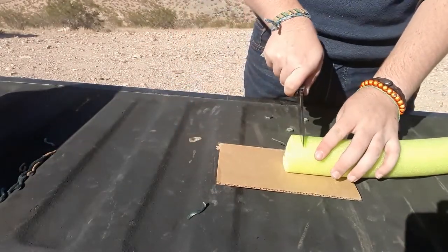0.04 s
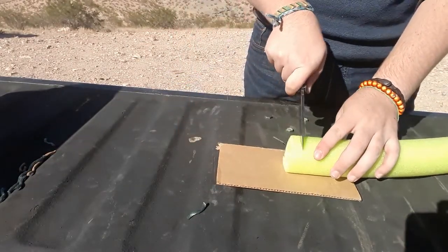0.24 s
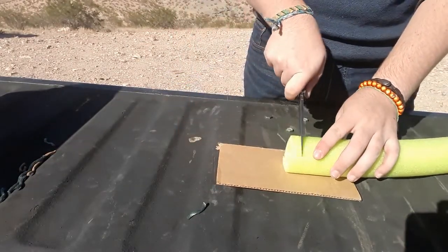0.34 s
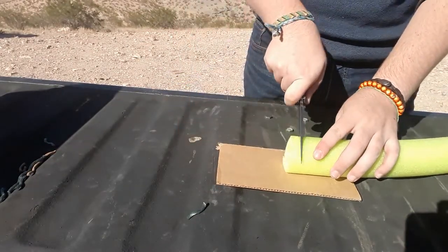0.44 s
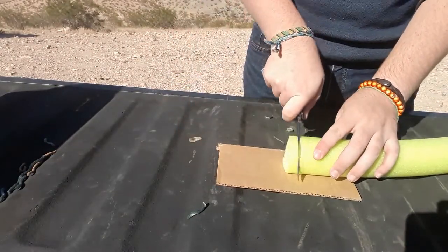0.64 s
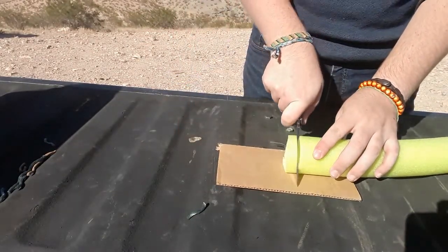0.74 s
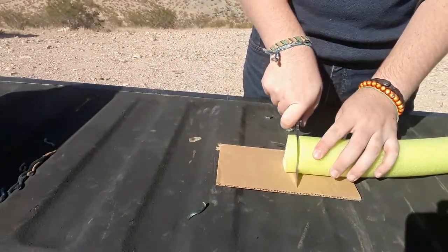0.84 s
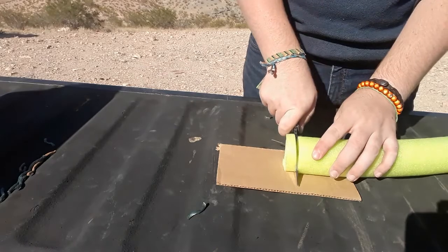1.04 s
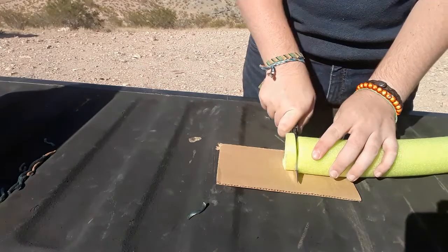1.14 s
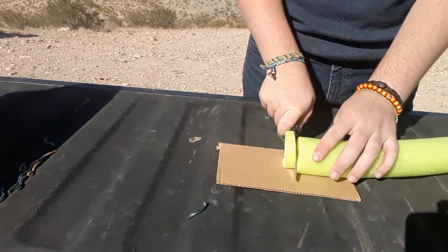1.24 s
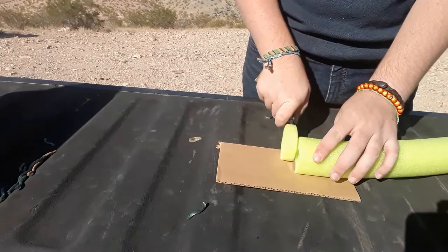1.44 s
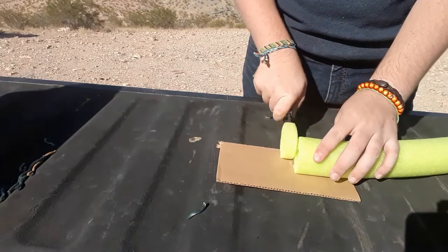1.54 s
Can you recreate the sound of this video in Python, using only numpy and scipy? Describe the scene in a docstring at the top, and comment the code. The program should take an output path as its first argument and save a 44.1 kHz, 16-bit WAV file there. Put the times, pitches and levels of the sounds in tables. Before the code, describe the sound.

A knife cutting foam outdoors, close and dry. Light low wind and faint hiss come first; from 0.23 seconds the blade rasps through in a dense, crackling tear, strongest and brightening around 0.5 to 0.7. It fades to tiny ticks by 0.8, with a deep wind buffet near 1.05. A shorter crunch finishes the cut at 1.15 to 1.35, then the slice rubs softly aside until about 1.6.

```python
"""Outdoors, a breeze of lumpy low noise blows on the two microphone ports, over a faint hiss.
A knife is pushed down through a foam tube on cardboard: cells burst as random clicks, big tears as flurries
with a snap, and both strike a bank of resonances. One long push, then a creep, with one deep wind buffet
of a few low cycles; then the cut finishes. Last, the slice is drawn aside: resonated noise, a soft rub."""
import sys
import numpy as np
from scipy import signal
from scipy.fft import rfft, irfft
from scipy.io import wavfile

SR = 44100
rng = np.random.default_rng(int(sys.argv[2]) if len(sys.argv) > 2 else 0)


def file_out(sig):
    """Save sig as 16-bit WAV at sys.argv[1]."""
    # one column per channel
    cols = np.atleast_2d(sig).T
    # limit, then scale
    lim = np.clip(cols, -1, 1)
    pcm = np.round(lim * 32767).astype(np.int16)
    wavfile.write(sys.argv[1], SR, pcm)


def nominal_scale(level):
    """Amplitude ratio for a level in decibels (scalar or array-like)."""
    x = np.asarray(level, float) / 20
    return 10 ** x


N = 70560


def rms_one(x):
    """Scale to rms 1."""
    return x / np.sqrt(np.mean(x ** 2) + 1e-20)


def in_time(rows, outside=None):
    """Table columns as straight lines in time; first column is time_s."""
    time_s, *columns = np.transpose(rows)
    t = np.arange(N) / SR
    return [np.interp(t, time_s, column, left=outside, right=outside) for column in columns]


def drift(hz):
    """Slow random wander, rms 1: white noise through two equal one-pole low-passes."""
    r = np.exp(-2 * np.pi * hz / SR)
    wander = signal.lfilter([1], [1, -2 * r, r * r], rng.standard_normal(N + SR))
    return rms_one(wander[SR:])  # first second settles the filter


def coloured(points, channels):
    """White noise shaped to a spectrum given as (freq_hz, density_db), rms 1."""
    freq_hz, density_db = np.transpose(points)
    bins_hz = np.arange(N // 2 + 1) * SR / N
    gain = nominal_scale(np.interp(np.log(bins_hz + 1), np.log(freq_hz), density_db))
    return rms_one(irfft(rfft(rng.standard_normal((channels, N))) * gain, N))


def resonance(x, hz, width_hz):
    """Two-pole ring with gain 1 on top."""
    r = np.exp(-np.pi * width_hz / SR)
    poles = [1, -2 * r * np.cos(2 * np.pi * hz / SR), r * r]
    return signal.lfilter([(1 - r * r) / 2, 0, (r * r - 1) / 2], poles, x + 1e-18)


def bursts(per_s, spread_db):
    """Random clicks of uneven size and sign, rms 1."""
    size = nominal_scale(spread_db * np.minimum(rng.exponential(1, N), 3.5))
    sign = rng.choice([-1, 1], N)
    return rms_one(size * sign * (rng.random(N) < per_s / SR))


# microphone hiss spectrum: freq_hz, density_db (relative)
HISS_SPECTRUM = [(300, -50), (600, -15.5), (5400, -26.5), (16000, -23)]


def hiss():
    """Steady microphone noise, its own at each port."""
    return nominal_scale(-74) * coloured(HISS_SPECTRUM, channels=2)


# gust strength: time_s, level_db (before the low cut)
GUSTS = [(0, -63), (.09, -65.5), (.13, -48.5), (.2, -57.5), (.3, -49), (.5, -63.5), (.72, -51.5),
         (.84, -64.5), (.885, -48.5), (.97, -38.5), (1.08, -46.5), (1.4, -55.5), (1.55, -62.5), (1.6, -45)]
# wind spectrum: freq_hz, density_db (relative)
WIND_SPECTRUM = [(15, -37), (40, -6), (85, -2.5), (130, -3.5), (240, -16.5), (420, -22.5), (700, -42.5),
                 (1200, -81)]
WIND_LUMP_DB, WIND_LUMP_HZ = 5, 23.1
WIND_SHARED = 0.04  # share of power common to both ports
WIND_PAN_DB, WIND_LOW_CUT_HZ = -2, 70  # pan: left minus right


def wind():
    """Turbulence at the ports: lumpy low noise, mostly its own in each."""
    level_db, = in_time(GUSTS)
    own = coloured(WIND_SPECTRUM, channels=3)
    lumps = np.array([drift(WIND_LUMP_HZ), drift(WIND_LUMP_HZ)])
    mix = np.sqrt(1 - WIND_SHARED) * own[:2] + np.sqrt(WIND_SHARED) * own[2]
    gusts = rms_one(mix * nominal_scale(WIND_LUMP_DB * lumps))
    gusts = gusts * nominal_scale(level_db + np.outer([.5, -.5], WIND_PAN_DB))
    low_cut = signal.butter(2, WIND_LOW_CUT_HZ, "high", fs=SR, output="sos")
    return signal.sosfilt(low_cut, gusts)


BUFFET_S, BUFFET_DB, BUFFET_HZ, BUFFET_SIGMA_S = 1.05, -32.5, 131, 0.0043


def buffet():
    """One deep buffet, alike on both ports: a few low cycles under a Gaussian swell."""
    t = np.arange(N) / SR - BUFFET_S
    swell = np.exp(-.5 * (t / BUFFET_SIGMA_S) ** 2)
    return nominal_scale(BUFFET_DB) * swell * np.sin(2 * np.pi * BUFFET_HZ * t)


PORT_SPREAD = 0.4  # port-to-port difference of rub and clicks, ratio
# rub strength: time_s, level_db
SLIDE_LEVEL = [(1.3, -71), (1.36, -58), (1.47, -60.5), (1.54, -64.5), (1.6, -68)]
# rings of the sliding slice: freq_hz, width_hz, level_db (relative)
SLIDE_RINGS = [(1320, 1170, 4), (2390, 1440, 0.5), (6100, 10500, 1), (14300, 2800, -7.5)]


def slide():
    """Slice drawn aside: friction noise through doubled resonances, partly different at each port."""
    mid, side = rng.standard_normal((2, N))
    rub = mid + PORT_SPREAD * np.outer([1, -1], side)
    rings = 0
    for k, (hz, width_hz, level_db) in enumerate(SLIDE_RINGS):
        ring = resonance(resonance(rub, hz, width_hz), hz, width_hz)
        rings = rings + (-1) ** k * nominal_scale(level_db) * ring
    level_db = in_time(SLIDE_LEVEL, outside=-120)[0]
    uneven_db = 0.83 * drift(33)
    return nominal_scale(level_db + uneven_db) * rms_one(rings)


# big tears, many cells giving at once: start_s, level_db (relative, before trim)
BIG_TEARS = [(0.2359, -31), (0.243, -17.5), (0.2528, -17), (.276, -23), (.2981, -15.5), (0.3146, -20.5),
             (0.3579, -24.5), (.457, -21), (0.4796, -20.5), (0.513, -23.5), (0.5314, -16.5),
             (0.5329, -19.5), (0.5467, -30.5), (0.5648, -23.5), (0.5794, -22), (0.6139, -18),
             (0.6377, -20.5), (.6527, -13), (0.6696, -19), (0.6809, -17.5), (0.7078, -22.5), (.7261, -31),
             (.7341, -24), (0.7458, -25.5), (.758, -33), (0.773, -30), (0.7797, -37), (0.8182, -33.5),
             (0.8406, -37), (.8565, -34), (0.9212, -34.5), (0.9531, -27.5), (.9789, -27.5), (1.004, -39),
             (1.1492, -30), (1.1661, -27), (1.199, -18), (1.2111, -20.5), (1.2259, -40), (1.2548, -22),
             (1.2591, -22.5), (1.2695, -31.5), (1.3049, -21), (1.3128, -30.5), (1.3171, -22.5),
             (1.3263, -29)]
TEAR_TRIM_DB, TEAR_CELLS_PER_S = -1.5, 9500
TEAR_RISE_S, TEAR_DECAY_S = .0009, 0.0013


def tears():
    """Each tear is a flurry of bursts that swells to a snap and dies; returns flurries and snaps."""
    flurries, snaps = np.zeros(N + SR), np.zeros(N + SR)
    flurry = np.pad(bursts(TEAR_CELLS_PER_S, 1.0), (0, SR))
    age = np.arange(SR // 20) / SR - TEAR_RISE_S  # 0 at the snap
    shape = np.where(age < 0, 1 + age / TEAR_RISE_S, np.exp(-age / TEAR_DECAY_S))
    for start_s, level_db in BIG_TEARS:
        i = int(start_s * SR)
        gain = nominal_scale(level_db + TEAR_TRIM_DB)
        flurries[i:i + len(age)] += gain * flurry[i:i + len(age)] * shape * 0.2
        snaps[i + np.argmax(age > 0)] = gain * 1.58
    return flurries[:N], snaps[:N]


# blade working through the foam: time_s, level_db (relative, before trim), tilt_db_per_octave
CUTTING = [(.233, -51, 2), (.246, -41, -1.5), (.336, -42.5, -1.6), (.431, -41.5, -0.8), (.491, -36.5, -1.1),
           (.611, -36, -0.4), (.681, -38.5, 1), (.741, -47, 2), (.801, -64, 4), (.881, -54, 2),
           (.971, -58.5, 1.5), (1.031, -65.5, 4), (1.086, -89.5, 4.8), (1.126, -63, 2.2),
           (1.171, -47.5, 0.9), (1.206, -38, 1.17), (1.281, -52.5, 0.7), (1.316, -40.5, 0.1),
           (1.346, -62, -1.5)]
CUT_TRIM_DB, CELLS_PER_S, CELL_SPREAD_DB = -1.5, 2200, 3.5
CLUMP_DB, CLUMP_HZ = 2, 120


def cells():
    """Cells burst under the edge as random clumped clicks, only while the blade works."""
    level_db, _ = in_time(CUTTING)
    cutting, = in_time([(CUTTING[0][0], 1), (CUTTING[-1][0], 1)], outside=0)
    clicks = bursts(CELLS_PER_S, CELL_SPREAD_DB) * nominal_scale(CLUMP_DB * drift(CLUMP_HZ))
    return clicks * nominal_scale(level_db + CUT_TRIM_DB) * cutting


# rings of foam and board: freq_hz, width_hz, level_db (relative)
FOAM_RINGS = [(422, 160, -12.5), (809, 260, -5.5), (1150, 334, -1.5), (1820, 415, 0), (2500, 297, -1.5),
              (3236, 544, -3.5), (4490, 560, -4), (5200, 2500, -8.5), (7610, 1900, -9),
              (10780, 2130, -11.5), (13030, 750, -7), (15400, 1300, -10)]
# ring that stands out, moving as the blade sinks: time_s, freq_hz
FOCUS_PATH = [(.25, 1760), (.3, 1570), (.52, 1080), (.64, 3060), (.78, 2960), (.92, 1890)]
# gain of the lows of the cut: time_s, gain_db
LOW_GAIN = [(.231, 4.5), (.501, 0), (.751, 13), (.821, -1), (1.151, -18), (1.191, 10.5)]
FOCUS_DB, FOCUS_SIGMA_OCTAVES = 6, .35
TILT_PIVOT_HZ, LOWS_BELOW_HZ = 1920, 725
PATCH_DB, PATCH_HZ = 1, 25.8  # slow swell of each resonance on its own
CLICK_COLOUR_DB = 2  # click-to-click strength spread in each resonance
SPREAD_FULL_HZ = 3300  # port spread shrinks below
CRACK_DB, CRACK_ABOVE_HZ = -19, 1200  # bare tear, unresonated


def foam():
    """Cells and tears strike every resonance, each click with a strength and side of its own."""
    _, tilt_db = in_time(CUTTING)
    focus_hz, = in_time(FOCUS_PATH)
    cell_clicks = cells()
    flurries, snaps = tears()
    crack_filter = signal.butter(2, CRACK_ABOVE_HZ, "high", fs=SR, output="sos")
    out = nominal_scale(CRACK_DB) * signal.sosfilt(crack_filter, snaps + flurries)
    for k, (hz, width_hz, level_db) in enumerate(FOAM_RINGS):
        off_focus = np.log2(hz / focus_hz) / FOCUS_SIGMA_OCTAVES
        colour_db = tilt_db * np.log2(hz / TILT_PIVOT_HZ) + FOCUS_DB * np.exp(-.5 * off_focus ** 2)
        clicks = cell_clicks * nominal_scale(PATCH_DB * drift(PATCH_HZ)) + flurries + snaps
        clicks = clicks * nominal_scale(colour_db + CLICK_COLOUR_DB * rng.standard_normal(N))
        spread = PORT_SPREAD * min(hz / SPREAD_FULL_HZ, 1)
        lean = np.outer([1, -1], spread * rng.standard_normal(N))
        out = out + (-1) ** k * nominal_scale(level_db) * resonance(clicks * (1 + lean), hz, width_hz)
    # each split filter runs twice
    low, high = [np.tile(signal.butter(2, LOWS_BELOW_HZ, side, fs=SR, output="sos"), (2, 1))
                 for side in ("low", "high")]
    lows = nominal_scale(in_time(LOW_GAIN)[0]) * signal.sosfilt(low, out)
    return nominal_scale(10) * (signal.sosfilt(high, out) + lows)


LEFT_LEAD_S, SIDE_DB = 1.3e-5, 0.23  # side: up on the left, down on the right
SCATTER_DB, SCATTER_T60_S = -14, .025


def place(x):
    """Sound arrives a hair earlier and louder on the left; short scatter off deck and hands follows."""
    bins_hz = np.arange(N // 2 + 1) * SR / N
    lagged = irfft(rfft(x[1]) * np.exp(-2j * np.pi * bins_hz * LEFT_LEAD_S), N)
    direct = np.array([nominal_scale(SIDE_DB) * x[0], nominal_scale(-SIDE_DB) * lagged])
    t = np.arange(SR // 10) / SR
    scatter = rng.standard_normal(len(t)) * nominal_scale(-60 * t / SCATTER_T60_S)
    scatter = scatter[None] / np.linalg.norm(scatter)
    return direct + nominal_scale(SCATTER_DB) * signal.fftconvolve(direct, scatter, axes=1)[:, :N]


def scene():
    """Foam and slide in their place, wind and buffet on the ports."""
    return place(foam() + slide()) + wind() + buffet()


def roll_off(x):
    """The treble ends steeply here."""
    return signal.sosfilt(signal.butter(12, 16540, fs=SR, output="sos"), x)


def record(dry):
    """Microphone hiss joins, then a steep top cut."""
    top_cut = signal.cheby2(16, 60, 16150, fs=SR, output="sos")  # order, stop_db, stop_hz
    mix = signal.sosfilt(top_cut, dry + hiss())
    return roll_off(mix)


dry = scene()
out = record(dry)
file_out(out)
```